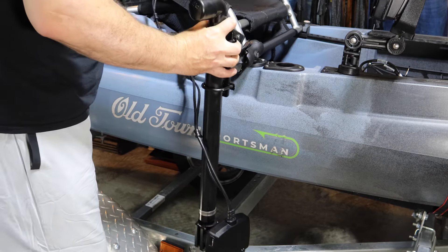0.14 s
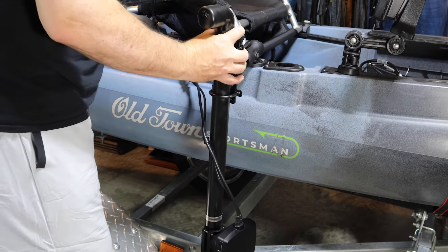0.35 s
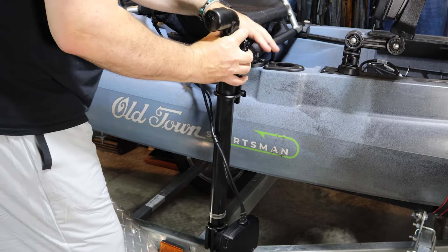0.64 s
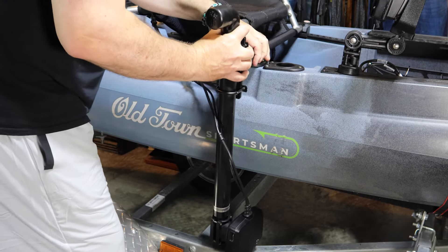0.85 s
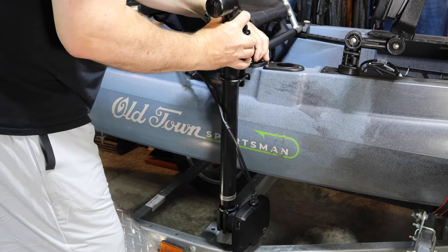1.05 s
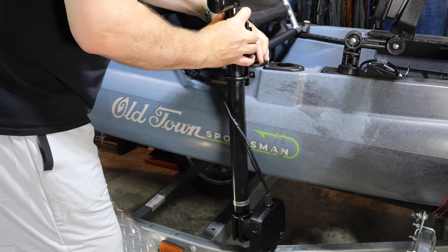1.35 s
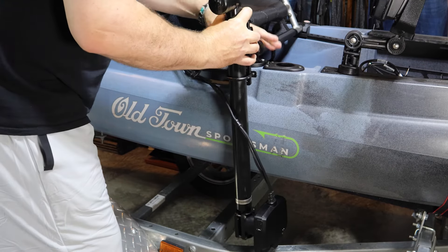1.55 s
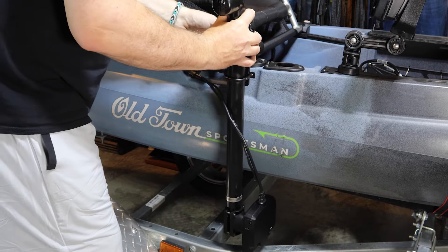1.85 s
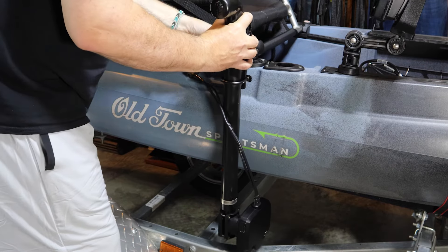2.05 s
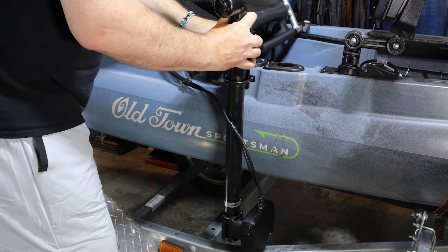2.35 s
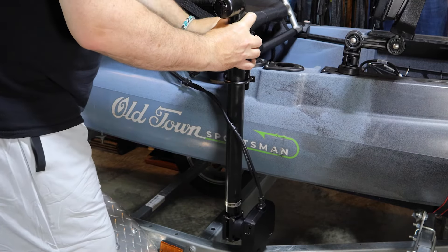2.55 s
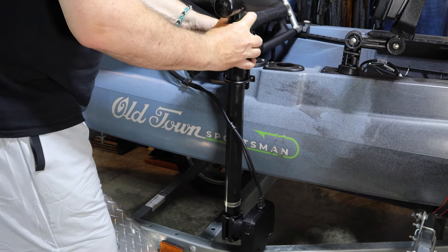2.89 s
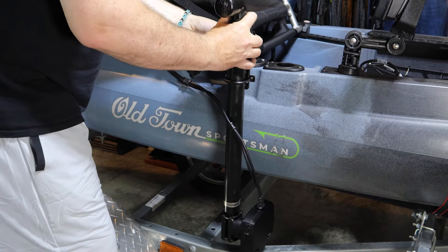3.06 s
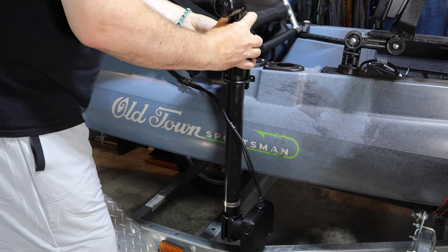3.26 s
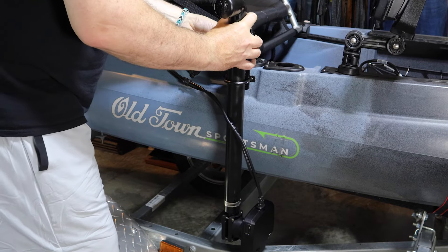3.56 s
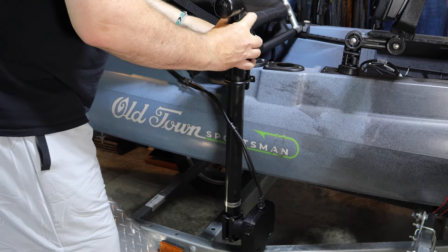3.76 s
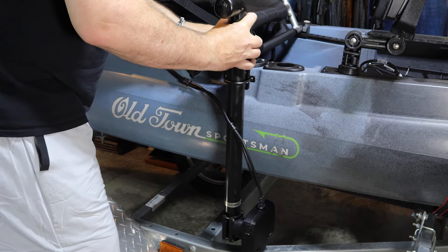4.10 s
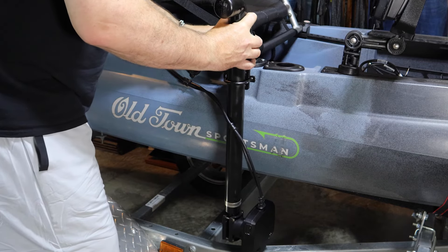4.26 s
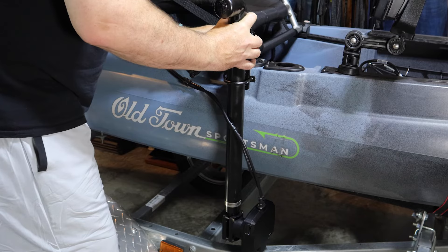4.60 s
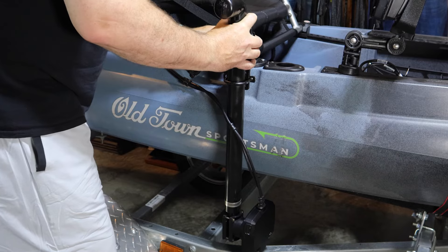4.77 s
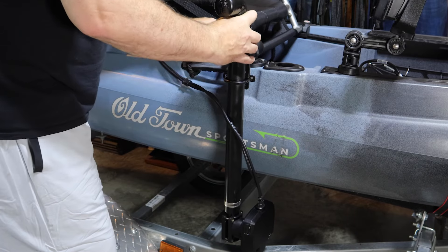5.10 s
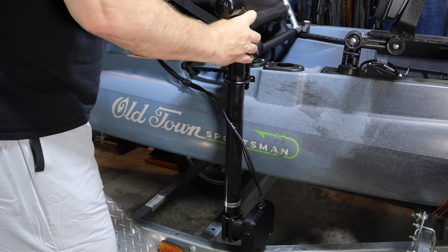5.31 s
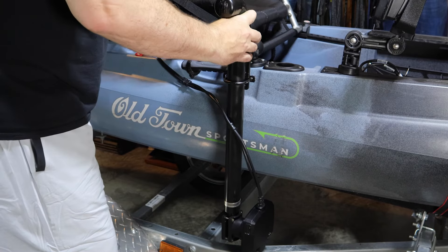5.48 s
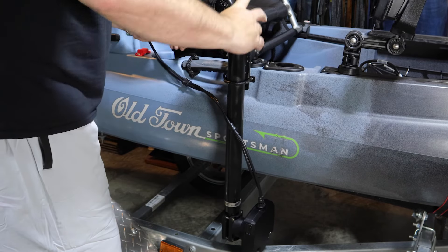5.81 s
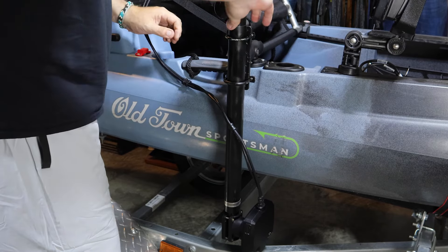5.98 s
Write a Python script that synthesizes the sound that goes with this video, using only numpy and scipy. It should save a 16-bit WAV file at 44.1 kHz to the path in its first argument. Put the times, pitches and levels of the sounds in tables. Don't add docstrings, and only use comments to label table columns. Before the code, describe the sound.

Dry handling sounds on a hollow kayak hull: small ticks, dull thuds, a strong double-edged knock, then quieter rattling bumps. A latch clicks once softly and later firmly, dry plastic chirps and squeaks, and a rapid series of hard, short clicks locks it home. Light bumps trail off. Short garage reverberation, a faint low distant motor, close microphone with left open and right blocked, passing mostly bass.

```python
import sys
import numpy as np
from scipy import signal
from scipy.fft import rfft, irfft
from scipy.io import wavfile
from scipy.ndimage import uniform_filter1d

SR = 44100
rng = np.random.default_rng(int(sys.argv[2]) if len(sys.argv) > 2 else 0)


def int16_out(signal):
    q = np.round(np.clip(np.atleast_2d(signal).T, -1, 1) * 32767)
    wavfile.write(sys.argv[1], SR, q.astype(np.int16))


def convert_level_to_amplitude(level_db):
    exponent = np.asarray(level_db, float) / 20
    return 10 ** exponent


N = 270950


def slow(rate):
    hold = int(SR / rate)
    steps = np.repeat(rng.standard_normal(N // hold + 1), hold)
    return 1.605 * uniform_filter1d(steps, hold)[:N]


def shaped(x, points):
    hz, db = np.transpose(points)
    f = np.arange(len(x) // 2 + 1) * SR / len(x) + 1
    gain = convert_level_to_amplitude(np.interp(np.log(f), np.log(hz), db))
    y = irfft(rfft(x) * gain, len(x))
    return y / np.sqrt(np.mean(y ** 2))


def ring(times, peak_db, modes, push_s, scatter_db, detune, centre_hz=None, choke_s=1):
    seat_db_per_octave = -8
    hz, db, t60 = np.array(modes).T[:, :, None]
    t = np.arange(int(.35 * SR)) / SR
    signs = np.where(np.arange(len(modes)) % 2, -1, 1)
    envelope = (1 - np.exp(-t / push_s)) ** 2 * np.exp(-(t / choke_s) ** 3)
    chance = rng.standard_normal((len(times), 2, len(modes), 1))
    out = np.zeros(N + SR)
    for k, (size, tune) in enumerate(chance):
        near_db = 0
        if centre_hz is not None:
            near_db = seat_db_per_octave * np.abs(np.log2(hz / centre_hz[k]))
        decay = convert_level_to_amplitude(db + near_db + scatter_db * size - 60 * t / t60)
        rings = decay * np.sin(2 * np.pi * hz * (1 + detune * tune) * t)
        y = (signs @ rings) * envelope
        start = int(times[k] * SR)
        out[start:start + len(t)] += convert_level_to_amplitude(peak_db[k]) * y / np.abs(y).max()
    return out[:N]


def crack(times, peak_db, colour, t60):
    t = np.arange(600) / SR
    out = np.zeros(N + SR)
    for s, peak in zip(times, peak_db):
        y = shaped(rng.standard_normal(len(t)), colour) * convert_level_to_amplitude(-60 * t / t60)
        start = int(s * SR)
        out[start:start + len(t)] += convert_level_to_amplitude(peak) * y / np.abs(y).max()
    return out[:N]


def wandering_tone(slips, overtones_db, wobble, flutter_db, rate):
    s, hz, db = np.concatenate(slips).T
    t = np.arange(N) / SR
    on = sum(((t >= slip[0][0]) & (t <= slip[-1][0])) * 1. for slip in slips).clip(0, 1)
    pitch = np.interp(t, s, hz) * (1 + wobble * slow(rate))
    phase = 2 * np.pi * np.cumsum(pitch) / SR
    tone = np.sin(phase)
    for k, overtone_db in enumerate(overtones_db):
        tone += convert_level_to_amplitude(overtone_db) * np.sin((k + 2) * phase)
    level = convert_level_to_amplitude(np.interp(t, s, db) + flutter_db * slow(rate))
    return uniform_filter1d(on, size=130) * level * tone


# (frequency [Hz], level [dB])
AIR = [(20, -47), (40, -23), (70, 0), (330, 0.5), (600, -1), (1100, -5), (2400, -11), (16000, -20)]


def room_air():
    return convert_level_to_amplitude(-60.5 + 0.72 * slow(3.52)) * shaped(rng.standard_normal(N), AIR)


# (time [s], pitch [Hz], level [dB])
DRONE = [
    (3.6, 64.4, -73),
    (3.9, 67.7, -70),
    (4.4, 69.36, -52),
    (5.1, 70.9, -70.5),
    (5.6, 76, -74.5),
    (5.95, 83.7, -72),
    (6.14, 83.9, -72),
]


def motor():
    return wandering_tone([DRONE], [-14], wobble=.03, flutter_db=2.5, rate=8)


# (frequency [Hz], time to fall 60 dB [s], level [dB])
GARAGE = [(60, 0.78, -33), (153.2, 0.22, -15), (400, 0.3, -27), (1080, 0.45, -32.5), (2380, 0.46, -27.5),
          (4840, 0.41, -29), (9900, 0.34, -29.5), (17200, 0.19, -51)]
# (delay [s], level [dB])
ECHOES = [
    (.0040, -10),
    (.0062, -17),
    (.0125, -21),
]


def garage(near, far):
    t = np.arange(int(.9 * SR)) / SR
    hz, t60, db = np.transpose(GARAGE)
    f, frames, z = signal.stft(rng.standard_normal(len(t)), SR, nperseg=256)
    at = np.log(f + 40)[:, None]
    start_db = np.interp(at, np.log(hz), db)
    z = z * convert_level_to_amplitude(start_db - 60 * frames / np.interp(at, np.log(hz), t60))
    tail = signal.istft(z, SR, nperseg=256)[1][:len(t)] * (1 - np.exp(-t / .005)) ** 2
    echoes = sum(convert_level_to_amplitude(echo_db) * np.roll(near, int(delay * SR)) for delay, echo_db in ECHOES)
    return near + uniform_filter1d(echoes, size=3) + signal.fftconvolve(far, tail)[:N]


# (time [s], level [dB])
RUB = [(0.0, -56), (0.2, -57.5), (0.3, -59.5), (0.64, -81), (0.84, -63.5), (0.96, -61), (1.07, -56),
       (1.25, -72.5), (1.5, -45), (1.62, -50), (1.85, -70.5), (2.46, -77), (2.56, -52), (2.85, -82),
       (3.07, -87), (3.7, -54), (4.85, -74), (5.1, -62)]


def rubbing():
    s, db = np.transpose(RUB)
    rub_db = np.interp(np.arange(N) / SR, s, db)
    hits = (rng.random(N) < 2500 / SR) * rng.standard_normal(N)
    grains = hits * convert_level_to_amplitude(3 * rng.exponential(size=N).clip(0, 3) + 2 * slow(25))
    dull = shaped(grains, [(30, -40), (60, -14), (130, -4), (350, 0), (800, -7), (2000, -28), (6000, -70)])
    bright = shaped(grains, [(300, -50), (700, -12), (1400, 0), (2500, -6), (5000, -24), (12000, -50)])
    bright_db = -6.5 - 0.14 * (rub_db + 61.5)
    return convert_level_to_amplitude(rub_db - 1.5) * (dull + convert_level_to_amplitude(bright_db) * bright)


def strain():
    start_s, end_s = 3.405, 3.995
    start_hz, creep_hz_per_s = 1575, 70
    start_db, swell_db = -60, 3
    end_hz = start_hz + creep_hz_per_s * (end_s - start_s)
    line = [(start_s, start_hz, start_db), (end_s, end_hz, start_db + swell_db)]
    return wandering_tone([line], [-30], wobble=.013, flutter_db=4, rate=120)


def chirps(rows):
    peak_at, top_at = 0.44, .28
    edge_db = -14.5
    u = np.linspace(0, 1, num=12)
    sag = (np.abs(u - top_at) / (1 - top_at)) ** 1.2
    edge = np.interp(u, [0, peak_at, 1], [1, 0, 1])
    slips = []
    for s, length, top_hz, last_hz, db in rows:
        slips.append(np.transpose([s + length * u, top_hz + (last_hz - top_hz) * sag, db + edge_db * edge]))
    return slips


# (time [s], pitch [Hz], level [dB])
LOW_SQUEAKS = [
    [(3.998, 1275, -57), (4.006, 1290, -29), (4.017, 1668, -36), (4.022, 1505, -54)],
    [(4.027, 1380, -44), (4.041, 989, -27.5), (4.05, 1175, -23), (4.06, 1490, -26), (4.069, 1438, -29),
     (4.076, 1331, -20), (4.084, 1510, -29), (4.093, 1200, -34), (4.1, 1034, -19)],
]
# (time [s], length [s], top pitch [Hz], last pitch [Hz], peak level [dB])
HIGH_SQUEAKS = [
    (3.732, 0.045, 5100, 3730, -35),
    (3.842, 0.018, 4100, 3840, -48),
]
# (time [s], length [s], top pitch [Hz], last pitch [Hz], peak level [dB])
THIN_SQUEAK = [
    (2.622, .04, 6690, 5700, -36.5),
]


def squeaks():
    low = wandering_tone(LOW_SQUEAKS, [-21, -32, -40], wobble=0.0103, flutter_db=0.5, rate=200)
    high = wandering_tone(chirps(HIGH_SQUEAKS), [-12, -30], wobble=.004, flutter_db=1, rate=150)
    thin = wandering_tone(chirps(THIN_SQUEAK), [-30], wobble=.004, flutter_db=1, rate=150)
    return low + high + thin + strain()


# (time [s], pitch [Hz], peak level [dB], time to fall 60 dB [s])
SPRING = [
    (3.633, 8050, -28, .035),
    (3.633, 7100, -31, .012),
    (3.633, 5600, -30, .015),
    (4.214, 5200, -21, .014),
    (4.313, 5200, -22, .014),
    (4.435, 5200, -23, .014),
    (4.578, 5150, -21, .012),
    (4.576, 6500, -25, .01),
]
# (time [s], pitch [Hz], peak level [dB])
REBOUNDS = [
    (4.3378, 1145, -19.5),
    (4.446, 1640, -18.5),
    (4.61, 1320, -23.5),
]


def latch_spring():
    out = np.zeros(N)
    for at, hz, db, t60 in SPRING:
        out += ring([at], [db], [(hz, 0, t60)], 0.00034, scatter_db=0, detune=0)
    for at, hz, db in REBOUNDS:
        modes = [(hz, 0, 0.03), (.85 * hz, -5, 0.03)]
        out += ring([at], [db], modes, 0.0017, scatter_db=7, detune=0)
    return out


# (time [s], upper pawl ring [dB], lower pawl ring [dB], hull peak [dB], snap [dB])
LATCH = [
    (2.5498, -16.5, -20, -27.5, -26),
    (3.6314, -11, -16, -29, -17),
    (4.1149, -17, -15, -45, -21),
    (4.212, -9.5, -8, -35, -13.5),
    (4.3107, -9, -8.5, -34, -15),
    (4.4323, -8.5, -8, -31.5, -15.5),
    (4.5753, -5.5, -7.5, -27.5, -12.5),
]
# (frequency [Hz], level [dB], time to fall 60 dB [s])
PAWL_LOW = [(1040, 0, .03), (1350, -8, .03), (800, -15, .03)]
PAWL_HIGH = [(1970, 0, .03), (1650, -9, .03), (2550, -11, .03)]
# (frequency [Hz], level [dB])
SNAP = [(1500, -38), (3200, -10), (5200, 1), (6500, -6), (9000, -13), (13000, -21), (15000, -9),
        (16500, -21)]
# (frequency [Hz], level [dB])
LATCH_SPREAD = [(450, -32), (750, 1.5), (1300, 0.5), (2200, 0), (3300, -13), (4500, -13), (10000, -22),
                (15500, -8.5)]
# (frequency [Hz], level [dB], time to fall 60 dB [s])
HULL = [(160, -17, .08), (205, -16, .07), (250, -12, .07), (290, -7, .07), (343, -3, .07), (390, -1, .065),
        (445, -1, .06), (520, -9, .045), (590, -4, .045), (680, -3, .045)]
# (frequency [Hz], level [dB], time to fall 60 dB [s])
BOOM = [(57, -10, 0.31), (76, -9, 0.12), (96.7, -3, 0.18), (118.5, -2, 0.12), (140, -2.5, 0.099)]


def latch():
    s, high_db, low_db, hull_db, snap_db = np.transpose(LATCH)
    low = ring(s + .0009, low_db - 1, PAWL_LOW, .0001, scatter_db=1, detune=.01, choke_s=.0026)
    high = -ring(s + .00075, high_db - 1, PAWL_HIGH, .0001, scatter_db=1, detune=.01, choke_s=.0026)
    hull = ring(s + 0.0019, hull_db - 1.0, HULL, 0.0021, scatter_db=2.5, detune=0.038)
    hull += ring(s + .0015, hull_db - 19, BOOM[2:], .006, scatter_db=2.5, detune=.03)
    spring = latch_spring()
    snap = crack(s, snap_db, SNAP, .006)
    blows = np.zeros(N)
    blows[(s * SR).astype(int)] = convert_level_to_amplitude(high_db + 8.5)
    spread = shaped(blows, LATCH_SPREAD)
    spread = blows.max() * spread / spread.max()
    near = snap + low + high + hull + spring
    far = spread + hull + convert_level_to_amplitude(-10) * snap + .2 * spring
    return near, far


# (frequency [Hz], level [dB], time to fall 60 dB [s])
MOUNT = [(600, 0, .03), (720, 0, .028), (850, 0, .026), (970, 0, .024), (1170, 0, .02), (1360, 0, .017),
         (1600, 0, .014), (1950, 0, .012), (2350, -2, .01), (2800, -4, .008)]
# (frequency [Hz], level [dB])
TICK = [(1500, -10), (3000, 0), (5000, 7.5), (9000, -7.5), (16000, -15)]
# (frequency [Hz], level [dB])
CLACK = [(500, -32), (1200, 0), (1900, -4), (2600, -16), (5000, -34)]


def seat(s, mount_db, centre_hz, tick_db):
    mount = ring(s, mount_db, MOUNT, .0004, scatter_db=3, detune=.05, centre_hz=centre_hz + 0 * s)
    tick = crack(s, tick_db - 1, TICK, .008)
    clack = crack(s, mount_db - 10.5, CLACK, 0.013)
    return mount + tick + clack


# (time [s], boom [dB], hull panel [dB], mount [dB], tick [dB])
THUDS = [(.1759, -47.5, -32, -30, -41), (0.2882, -50, -37.5, -34.5, -52), (0.8504, -46.5, -35, -28, -40),
         (0.9342, -38, -26, -29, -53), (1.1543, -45.5, -24.5, -30, -35), (1.4181, -59, -23, -27, -39),
         (1.4239, -32.5, -28, -18.5, -42), (1.4368, -29.5, -8.5, -15.5, -31.5),
         (1.4479, -32.5, -22.5, -32, -36), (1.4669, -46, -23, -47, -52), (1.6599, -47.5, -29.5, -40, -42),
         (2.123, -48.5, -40.5, -47, -66), (2.5229, -57, -37, -46, -67), (3.0662, -50, -45, -39.5, -64),
         (5.636, -57, -32, -46, -64)]
# (time [s], hull panel [dB], mount [dB])
BUMPS = [(0.892, -30.5, -32), (0.972, -29.5, -60), (1.506, -26.5, -42), (1.5944, -32, -37),
         (2.08, -43.5, -48.5), (2.157, -42, -53), (2.1883, -33.5, -33), (2.471, -44, -43.5),
         (2.629, -39, -32), (2.784, -39.5, -36), (2.824, -40, -40.5), (2.8432, -47, -37),
         (3.01, -34.5, -46.5), (3.03, -38, -54), (3.161, -46, -41.5), (3.218, -47, -49),
         (3.2687, -40.5, -41.5), (3.306, -51, -49), (3.3247, -42.5, -38.5), (3.4475, -40.5, -46.5),
         (5.0662, -43, -42.5), (5.0857, -38.5, -33), (5.246, -41, -54), (5.2833, -48, -64),
         (5.3275, -41, -43.5), (5.486, -37.5, -55), (5.77, -45.5, -71)]
# (time [s], mount [dB], mount pitch centre [Hz], tick [dB])
TAPS = [(.0158, -38.5, 1500, -40), (.2515, -60, 2000, -44), (0.0898, -59, 1720, -42.5),
        (0.1034, -45, 2000, -40), (.2435, -45, 800, -41), (0.2612, -45, 1600, -34), (2.241, -47, 1980, -63),
        (2.5811, -31, 990, -54), (2.7552, -42, 1250, -46), (3.057, -51, 1480, -43), (3.113, -53, 990, -62),
        (3.4087, -41.5, 1460, -58), (5.0025, -49.5, 1151, -53), (5.127, -46, 1300, -40.5),
        (5.2001, -44, 1390, -46.5), (5.3263, -41.5, 1490, -53), (.065, -44.5, 2500, -60),
        (5.712, -49.5, 1020, -48), (5.7479, -65, 1125, -43.5), (6.0244, -48.5, 930, -49)]


def knocks():
    thud_hz, bump_hz = 930, 880
    s, boom_db, hull_db, mount_db, tick_db = np.transpose(THUDS)
    at, panel_db, seat_db = np.transpose(BUMPS)
    boom = ring(s, boom_db - 3, BOOM, .01, scatter_db=3, detune=.04)
    hull = ring(np.r_[s, at], np.r_[hull_db, panel_db] - 3, HULL, .0018, scatter_db=3, detune=.04)
    body = (boom + hull) * convert_level_to_amplitude(2 * slow(70))
    thuds = seat(s, mount_db, thud_hz, tick_db)
    bumps = seat(at, seat_db, bump_hz, seat_db - 16)
    taps = seat(*np.transpose(TAPS))
    return body + thuds + bumps + taps


def scene():
    squeaking = squeaks()
    air = room_air() + motor()
    handling = knocks() + rubbing()
    near, far = latch()
    far = far + convert_level_to_amplitude(-4.0) * handling + convert_level_to_amplitude(-7.5) * squeaking
    sound = garage(near + handling + squeaking, far)
    since = np.arange(N) / SR - 2.198
    sound = sound * convert_level_to_amplitude(-12 * (since > 0) * np.exp(-np.abs(since) / .08)) + air
    sound = signal.sosfilt(signal.butter(2, 45, "high", fs=SR, output="sos"), sound)
    return np.array([sound, sound])


def top_cut(x):
    return signal.sosfilt(signal.butter(12, 17000, fs=SR, output="sos"), x)


def record(dry):
    port_hz, port_q, leak, lag_s = 150, .8, 1.15, 1.1e-5
    f = np.arange(N // 2 + 1) * SR / N
    w = 1j * f / port_hz
    port = (1 + leak * w) / (1 + w / port_q + w * w) * np.exp(-2j * np.pi * f * lag_s)
    ports = np.array([dry[0], irfft(rfft(dry[1]) * port, N)])
    hiss_colour = [(100, 2), (2000, -6.0), (8000, -6.0), (16000, -10.5)]
    hiss = np.array([shaped(rng.standard_normal(N), hiss_colour) for _ in range(2)])
    return top_cut(ports + convert_level_to_amplitude(-67.5) * hiss)


dry = scene()
out = record(dry)
int16_out(out)
```